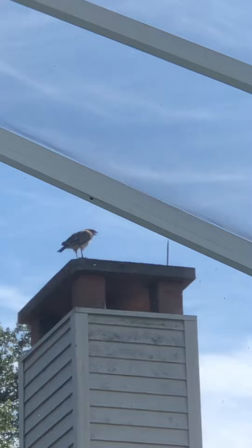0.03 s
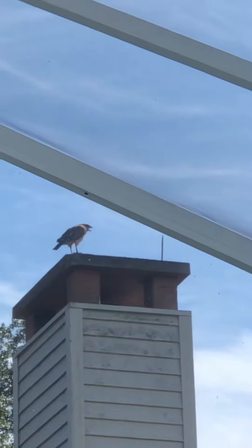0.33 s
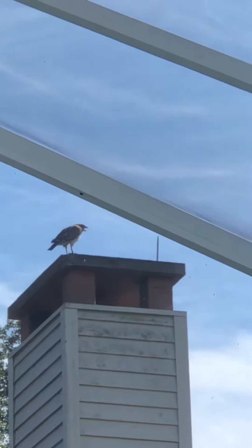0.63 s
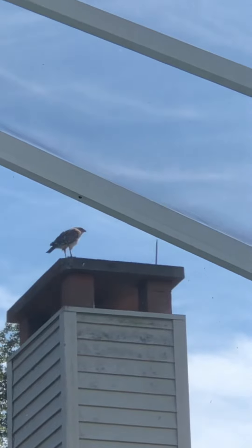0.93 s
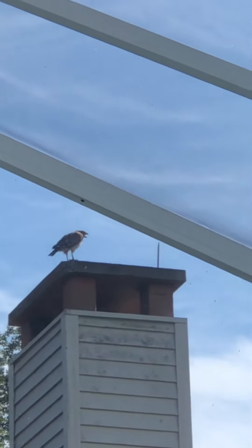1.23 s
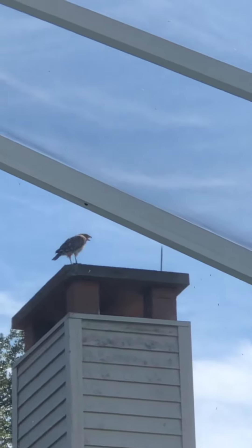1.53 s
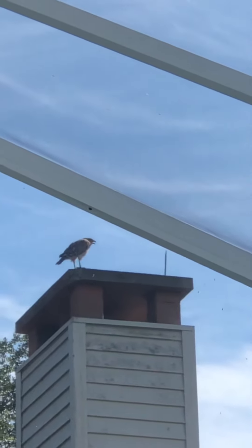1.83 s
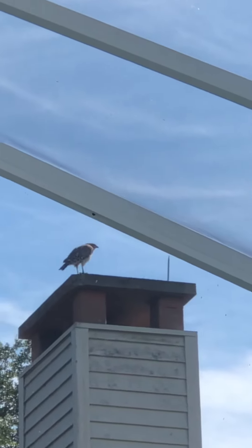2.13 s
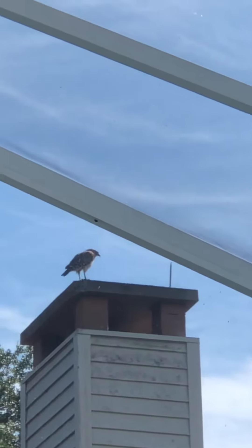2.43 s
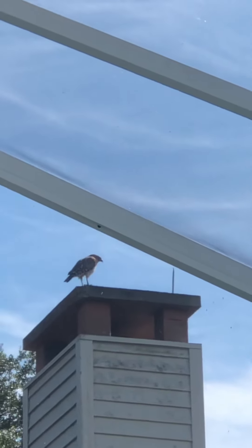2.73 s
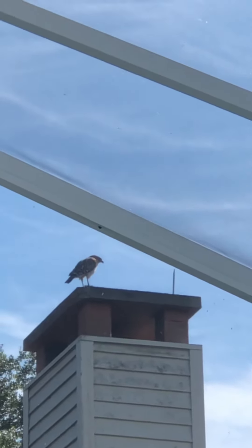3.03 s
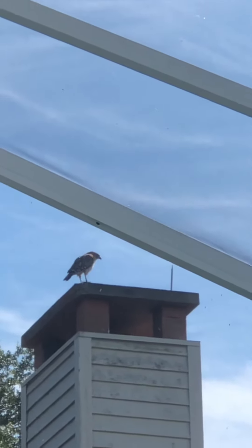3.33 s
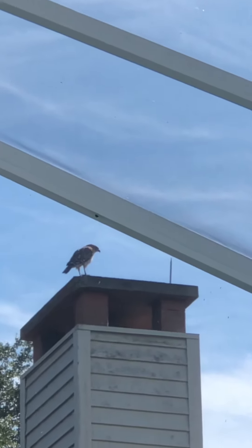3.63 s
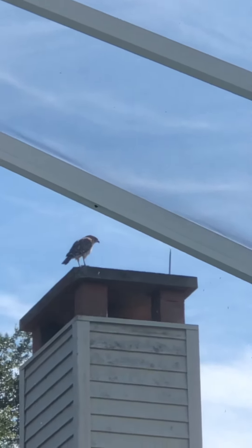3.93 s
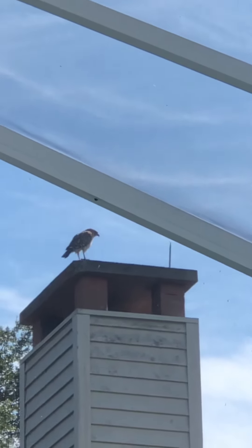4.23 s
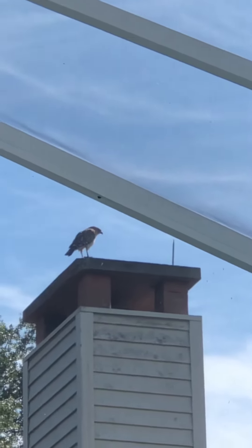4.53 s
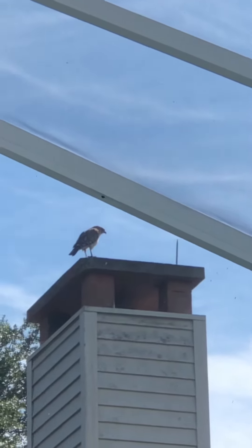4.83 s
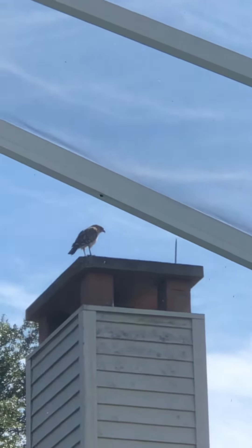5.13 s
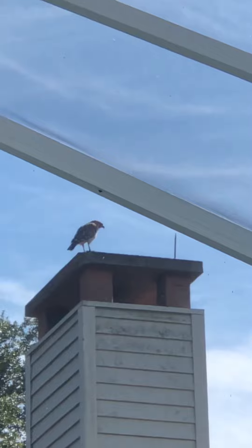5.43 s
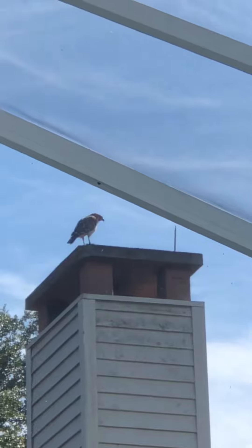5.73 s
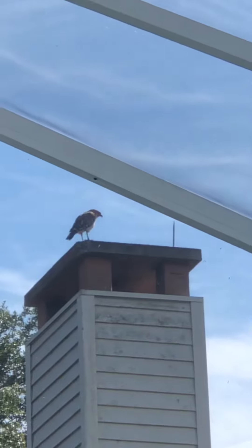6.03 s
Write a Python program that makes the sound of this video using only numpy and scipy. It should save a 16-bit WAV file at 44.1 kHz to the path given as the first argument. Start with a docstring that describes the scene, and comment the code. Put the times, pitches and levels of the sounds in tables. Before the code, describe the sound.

Two hoarse, two-note hawk screams echo across a yard, followed by faraway replies, with an air conditioner humming quietly underneath.

```python
"""A yard among walls and trees, heard from a hand-held camera's microphone. Close by, a hawk on a chimney
screams twice, "kee-aah": a high falling note that breaks down to a lower, hoarser one. Each side of
its syrinx sings a tone, and the throat rings on the partials. Walls and trees throw the cries back,
and other hawks answer from far away. An air conditioner hums under the outdoor hush, and the camera
is bumped a few times."""
import sys
import numpy as np
from scipy import signal
from scipy.fft import rfft, irfft, next_fast_len
from scipy.io import wavfile

SR = 44100
rng = np.random.default_rng(int(sys.argv[2]) if len(sys.argv) > 2 else 0)


def waveform_to_disk(signal):
    """Save audio, clipped to [-1, 1], as 16-bit WAV at the path in sys.argv[1]."""
    frames = np.transpose(np.atleast_2d(signal))
    scaled = np.clip(frames, -1, 1) * 32767
    samples = np.round(scaled).astype(np.int16)
    wavfile.write(sys.argv[1], SR, samples)


N = 268569
TIME = np.arange(N) / SR
EDGE_HZ = 15850  # top of the band
NOTE_EDGE_S = .005  # fade at each end of a near note

# the throat's response in the high register: (frequency [Hz], relative level [dB])
KEE_THROAT = [(700, -11), (1150, -7.5), (1420, -5), (2100, -0.5), (2700, -3), (3600, 0), (4250, -2),
              (4800, 0.5), (5550, 0.5), (6150, -14), (7400, -9), (8600, -19.5), (9900, -19.5), (11200, -30),
              (12600, -26), (13800, -43.5), (15500, -35)]
# slow drift of the hush and the hum: (time [s], level change [dB])
BACKGROUND_DRIFT = [(0, 2.5), (2.7, -0.5), (4.5, 0.68), (6.09, 0)]


def hawk():
    """The near hawk on its chimney: each scream catches, jumps to a high note and breaks into a low one."""
    # "kee": (time [s], length [s], top pitch [Hz], last pitch [Hz], ring level [dB],
    # ring offset before it blooms [dB], blooms after [s], ring fade [dB/s], flare at the break [dB],
    # level of the other partials [dB], their fade over the note [dB])
    high_notes = [(0.113, .293, 1444, 1177, -29.5, -7.5, 0.037, 19, 11, -37, 17),
                  (1.167, .355, 1430, 1186, -29.5, -9.5, 0.0805, 6, 15.4, -38, 8.3)]
    # "aah": (time [s], length [s], first pitch [Hz], sag [Hz/s], collapses after [s], last pitch [Hz],
    # ring level [dB], strongest overtone drops briefly at the microphone after [s])
    low_notes = [(0.394, .365, 915.7, 474.5, .238, 618, -39, 0.216),
                 (1.509, .336, 905, 301.7, 0.22, 635, -38.5, 0.147)]
    out = np.zeros(N)
    for row in high_notes:
        add(out, *catch(row[0]))
        add(out, *high_note(*row))
    for row in low_notes:
        add(out, *low_note(*row))
    return out


def catch(s, length_s=0.033, first_hz=833, last_hz=1064):
    """A short, rough upward croak that swells into the high note."""
    at = span(s - length_s, s + NOTE_EDGE_S)
    hz = np.linspace(first_hz, last_hz, len(at))
    db = np.linspace(-55, -45, len(at))
    start, croak = syrinx(at, hz, db, db - 4, KEE_THROAT, jitter=0.061, onset_jitter=0.022,
                          flicker_db=2, second_db=-26, rasp_db=-13)
    return start, croak * np.sqrt(np.linspace(0, 1, len(at)))


def high_note(s, length, top_hz, last_hz, db, unbloomed_db, bloom_s, fade_db_per_s, flare_db,
              rest_db, rest_fade_db, scoop=0.1375, scoop_s=0.01214):
    """The pitch scoops up and settles; the ring blooms, fades, and flares once as the voice breaks."""
    at = span(s, s + length)
    age = (at - at[0]) / SR
    left_s, open_s = age[::-1], np.maximum(age - bloom_s, 0)
    hz = settling(age, top_hz, last_hz) * (1 - scoop * np.exp(-age / scoop_s))
    bloom = .5 + .5 * np.tanh((age - bloom_s) / 0.0033)
    overshoot_db = 3 * bloom * np.exp(-open_s / 0.015)
    release_db = 13 * np.exp(-left_s / .045)
    ring = db + unbloomed_db * (1 - bloom) + overshoot_db - fade_db_per_s * open_s - release_db
    ring += flare_db * np.exp(-(left_s / .014) ** 2)
    rest = rest_db - rest_fade_db * (age / length) ** 3.1
    return syrinx(at, hz, ring, rest, KEE_THROAT, jitter=.0028, onset_jitter=0.018, waver=.002,
                  flicker_db=2.5, second_db=-7.5, rasp_db=-33, press_db=2)


def settling(age, top_hz, last_hz, settle_s=.16):
    """Pitch of a high note: holds, sinks, levels off."""
    sunk = 1 - 1 / (1 + (age / settle_s) ** 2.2)
    return top_hz + (last_hz - top_hz) * sunk / sunk[-1]


def low_note(s, length, first_hz, sag_hz_per_s, collapse_s, last_hz, db, dip_s, bend_s=0.0124):
    """The pitch sags, then collapses, while the level arches."""
    # the throat's response in the low register: (frequency [Hz], relative level [dB])
    aah_throat = [(650, -20), (880, -2), (1300, 4), (1750, -10.5), (2600, -8), (3400, -2.5), (4300, -3.5),
                  (5100, -4), (6000, -11.5), (6900, -7.5), (8200, -25.5), (9500, -23), (11800, -30.5),
                  (14000, -35.5)]
    at = span(s, s + length)
    age = (at - at[0]) / SR
    progress = age / length
    sagging = first_hz - sag_hz_per_s * age
    collapse = np.logaddexp(0, (age - collapse_s) / bend_s)
    hz = sagging + (last_hz - sagging[-1]) * collapse / collapse[-1]
    # heard at the microphone, the strongest overtone briefly drops in level
    dip_db = 8 * np.exp(-((age - dip_s) / 0.019) ** 2)
    overtone_db = db - 20 * (progress - 0.25) ** 2 - dip_db
    break_db = 6 * np.exp(-age / 0.038)
    rest_db = -47.5 - 27 * (progress - 0.59) ** 2 + break_db
    return syrinx(at, hz, overtone_db, rest_db, aah_throat, jitter=0.0067, onset_jitter=0.027,
                  waver=0.00427, flicker_db=3.0, second_db=-49.5, rasp_db=-19, slack_db=9)


def syrinx(at, hz, ring_db, rest_db, throat, jitter, onset_jitter, flicker_db, second_db, rasp_db,
           waver=0, press_db=0, slack_db=0, second_hz=2130, ring_hz=2520, ring_half_width_hz=600):
    """One side of the syrinx sings a harmonic stack; the other holds its own tone and adds sidebands."""
    # peaks and dips that make the cry's ringing band swell and fade as the pitch glides:
    # (frequency [Hz], gain [dB])
    ripple = [(2000, 8.5), (2350, -0.5), (2470, 3), (2600, -3.5), (2760, 0.5), (2900, 1.5)]
    size, age = len(at), (at - at[0]) / SR
    # the membranes flutter until they lock into their pitch
    unrest = jitter + onset_jitter * np.exp(-age / .014)
    turns = np.cumsum(hz * (1 + unrest * wander(340, size) + waver * wander(44.6, size))) / SR
    k = np.arange(1, 19)[:, None]
    partial_hz = k * hz
    # the first push is the brightest; as it slackens, the cry thins to its ring
    press = press_db * np.exp(-age / 0.2)
    rest_db = rest_db - slack_db * np.exp(-age[::-1] / 0.083)
    height = gain_of(read(throat, partial_hz) + press * (partial_hz > 6000)) * (partial_hz < EDGE_HZ)
    # the ring: partials inside the throat's main resonance, with a level of their own
    inside = 1 / (1 + ((partial_hz - ring_hz) / ring_half_width_hz) ** 8)
    ring = gain_of(ring_db) / np.linalg.norm(height * inside, axis=0)
    rest = gain_of(rest_db) / np.linalg.norm(height * (1 - inside) * (partial_hz > ring_hz), axis=0)
    # the rest flicker, each on its own, and the throat smears the pulses
    flicker = gain_of(flicker_db * np.array([wander(42, size) for _ in k]))
    lag, side_lag = rng.random((2, len(k), 1))
    weight = ring * gain_of(read(ripple, partial_hz)) * inside + rest * flicker * (1 - inside)
    stack = (height * weight * np.cos(2 * np.pi * (k * turns + lag))).sum(0)
    # the second tone joins a moment late, is chopped by the first into bright sidebands, and soon dies
    second_turns = np.cumsum(second_hz * (1 + .003 * wander(120, size))) / SR
    side_hz = second_hz + (k - 1) * hz
    side_db = read(throat, side_hz) + 2.5 * np.log2(side_hz / second_hz) + press * (side_hz > 6000)
    side_turns = second_turns + (k - 1) * turns + side_lag
    sidebands = gain_of(side_db) * (side_hz < EDGE_HZ) * np.cos(2 * np.pi * side_turns)
    second_envelope = (1 - np.exp(-(age / 0.0028) ** 2)) / (1 + (age / 0.062) ** 4)
    second = sidebands.sum(0) * gain_of(second_db) * second_envelope
    # air rasps through once a cycle, most at the start
    puffs = noise(throat, size) * (1 + np.cos(2 * np.pi * turns))
    rasp = puffs * gain_of(rasp_db) * (1 + 9 * np.exp(-age / .025))
    edges = np.minimum(1, np.minimum(age, age[::-1]) / NOTE_EDGE_S)
    return at[0] / SR, np.sqrt(2) * (stack + rest * (second + rasp)) * edges


def far_hawks(flutter_db=3.0, overlap_s=.02, sag_hz_per_s=345, second_hz=1448, second_sag_hz_per_s=370):
    """The same two-note scream from far off, fluttering on its way through the air to the microphone."""
    # (time [s], high note length [s], top pitch [Hz], pitch at the break [Hz], high note level [dB],
    # its loudest point [0-1], low note length [s], low pitch [Hz], low note level [dB],
    # level of the syrinx's second tone [dB], treble lift as the high note starts [dB])
    screams = [(3.379, 0.13, 1188, 1154, -67.5, 0.62, 0.48, 916, -68.5, -82.5, 5),
               (4.17, .32, 1228, 1082, -61.5, 0.38, 0.25, 872, -69.5, -72.5, 12),
               (4.945, .31, 1305, 1108, -60, 0.52, 0.26, 883, -63, -68.5, 5),
               (5.71, .31, 1298, 1117, -63, .48, .1, 894.4, -70, -67.5, -6.5)]
    out = np.zeros(N)
    for s, high_s, top_hz, break_hz, high_db, loudest, low_s, low_hz, low_db, second_db, lift in screams:
        high_age, low_age = span(0, high_s) / SR, span(0, low_s) / SR
        add(out, *far_note(s, settling(high_age, top_hz, break_hz), high_db, lift, loudest))
        add(out, *far_note(s, second_hz - second_sag_hz_per_s * high_age, second_db, lift_db=-17))
        add(out, *far_note(s + high_s - overlap_s, low_hz - sag_hz_per_s * low_age, low_db, lift_db=-18))
    return out * gain_of(flutter_db * wander(44))


def far_note(s, hz, db, lift_db, loudest=0.37, jitter=0.01, lift_s=0.089):
    """One distant note, its treble lifted or cut at the start; little but the throat's ring carries."""
    # the throat's response heard at a distance: (frequency [Hz], relative level [dB])
    far_throat = [(800, -23.5), (1250, 0.5), (1750, 7), (2350, 16.5), (2750, 8.5), (3300, -4), (3650, -1.5),
                  (4300, -13), (4900, -3), (7500, -34), (10000, -65)]
    size, k = len(hz), np.arange(1, 8)[:, None]
    lift = lift_db * np.exp(-np.arange(size) / SR / lift_s) * (k * hz[0] > 3100)
    hz = hz * (1 + jitter * wander(183, size))
    height = gain_of(read(far_throat, k * hz) + lift)
    stack = (height * np.cos(2 * np.pi * k * np.cumsum(hz) / SR)).sum(0)
    arch = gain_of(db - 22 * (np.linspace(0, 1, size) - loudest) ** 2)
    return s, arch * unit_rms(stack) * signal.windows.tukey(size, 0.222)


def walls(x):
    """Single echoes off nearby walls and roofs beat against the gliding pitch."""
    # (delay [s], level relative to the direct sound [dB])
    echoes = [(.0075, -24), (.019, -11.5), (.034, -17), (.052, -56), (.071, -13.5), (.098, -51.5)]
    out = np.zeros(N)
    for delay, db in echoes:
        add(out, delay, gain_of(db) * x)
    return out


def trees(x, reflections_per_s=2000, build_s=0.0017, dull_hz=7000):
    """Scattered reflections from around the yard; leaves soak up the treble."""
    # (frequency [Hz], time to die away by 60 decibels [s])
    decay_times = [(300, 0.287), (1500, 0.56), (2600, 0.45), (5000, 0.403), (9000, 0.31), (15000, 0.075)]
    taps = rng.choice([-1., 1.], SR) * (rng.random(SR) < reflections_per_s / SR)
    hz, t, spectra = signal.stft(taps, SR, nperseg=256)
    decay = gain_of(-60 * t / read(decay_times, hz)[:, None])
    treble_loss = np.hypot(1, hz / dull_hz)[:, None]
    build = 1 - np.exp(-t / build_s)
    tail = signal.istft(spectra * decay / treble_loss * build, SR, nperseg=256)[1]
    return signal.fftconvolve(x, tail / np.linalg.norm(tail))[:N]


def handling(grip_s=3.58, grip_spread_s=0.45, grip_db=-53.5):
    """Right at the microphone: the hand rumbles as it shifts its grip, bumps and brushes the camera."""
    # soft knocks: (time [s], peak level [dB], pitch [Hz], half length [s])
    bumps = [(3.459, -42, 135.6, 0.0084), (3.651, -40.5, 170.2, 0.0094), (3.668, -37, 74, 0.0028),
             (3.794, -37.5, 170.5, 0.0037), (3.799, -50, 91.8, 0.0097)]
    # fingers on the case: (time [s], level [dB], centre frequency [Hz], half length [s])
    brushes = [(2.25, -73.5, 8370, 0.088), (3.9, -69.5, 11000, .016)]
    # (frequency [Hz], relative level [dB])
    grip_spectrum = [(25, -36), (38, 2), (60, -7), (180, -10), (320, -49), (1000, -80)]
    out = noise(grip_spectrum) * gain_of(grip_db) * swell(grip_s, grip_spread_s)
    for s, db, hz, spread_s in bumps:
        out += gain_of(db) * swell(s, spread_s) * np.cos(2 * np.pi * hz * (TIME - s))
    for s, db, hz, spread_s in brushes:
        out += gain_of(db) * swell(s, spread_s) * noise([(hz / 2, -20), (hz, 0), (hz * 2, -20)])
    return out


def air_conditioner(buzz_hz=120.55, waver=0.00846, sway_db=1.2):
    """Wavering fan and compressor tones, and the motor's mains buzz, which fades once for a while."""
    # fan and compressor: (frequency [Hz], relative level [dB])
    tones = [(37.7, -16), (74.8, -1.5), (188.4, -15), (236, -16), (314, -17)]
    buzz_db = -55.5 - 3.5 * swell(s=4, spread_s=1.0) + 0.26 * wander(3.4)
    out = gain_of(buzz_db) * np.sin(2 * np.pi * buzz_hz * TIME)
    hum_db = -53 + np.interp(TIME, *np.transpose(BACKGROUND_DRIFT))
    for hz, db in tones:
        turns = np.cumsum(hz * (1 + waver * wander(2.23))) / SR
        out += gain_of(hum_db + db + sway_db * wander(1.8)) * np.sin(2 * np.pi * turns)
    return np.sqrt(2) * out


def outdoors(hush_db=-56.5, rumble_db=-57):
    """The yard's ambience: a wide hush over a low rumble, both swaying slightly."""
    # both spectra: (frequency [Hz], relative level [dB])
    hush_spectrum = [(120, -30), (200, -2), (447, -7), (498, -9.5), (609, -8), (745, -10.5), (998, -8.5),
                     (1150, -12), (1340, -13), (2190, -19), (4800, -24.5), (14900, -38.5), (15700, -34.5)]
    rumble_spectrum = [(24, -38), (36, -13), (60, 1.5), (90, 2), (140, -1.5), (200, -8), (260, -12.5),
                       (400, -59)]
    drift_db = np.interp(TIME, *np.transpose(BACKGROUND_DRIFT))
    hush = noise(hush_spectrum) * gain_of(hush_db + drift_db + 0.77 * wander(4.9))
    rumble = noise(rumble_spectrum) * gain_of(rumble_db + 0.6 * wander(3.9))
    return hush + rumble


def gain_of(db):
    """Decibels to gain."""
    return 10 ** (np.asarray(db) / 20)


def unit_rms(x):
    """Scales to rms 1."""
    return x / np.sqrt(np.mean(x ** 2) + 1e-20)


def read(points, hz):
    """Reads a curve on a log-frequency axis."""
    f, value = np.transpose(points)
    return np.interp(np.log(hz + 1), np.log(f + 1), value)


def add(mix, s, sound):
    """Mixes a sound in at a time."""
    part = mix[round(s * SR):][:len(sound)]
    part += sound[:len(part)]


def span(start, end):
    """Sample numbers between two times."""
    return np.arange(max(round(start * SR), 0), min(round(end * SR), N))


def swell(s, spread_s):
    """A bell-shaped envelope around a time."""
    return np.exp(-((TIME - s) / spread_s) ** 2)


def noise(spectrum, size=N):
    """Noise of rms 1 with the given spectrum."""
    count = next_fast_len(size)
    colour = gain_of(read(spectrum, np.fft.rfftfreq(count, 1 / SR)))
    return unit_rms(irfft(rfft(rng.standard_normal(count)) * colour, count)[:size])


def wander(rate_hz, size=N):
    """Smooth random motion of rms 1, mostly slower than the given rate."""
    count = size // 16 + 2
    f = np.fft.rfftfreq(count, 16 / SR)
    slow = irfft(rfft(rng.standard_normal(count)) / (1 + (f / rate_hz) ** 2), count)
    return np.interp(np.arange(size), np.linspace(0, size, count), unit_rms(slow))


def scene(direct_db=-3.5, wet_db=-14, far_wet_db=-9):
    """One microphone: the near hawk arrives mostly direct, the far ones with more scatter from the trees."""
    near, far = hawk(), far_hawks()
    birds = gain_of(direct_db) * (near + walls(near)) + far
    scattered = trees(gain_of(wet_db) * near + gain_of(far_wet_db) * far)
    return (birds + scattered + outdoors() + air_conditioner() + handling())[None]


def record(dry):
    """The recorder's band limit."""
    lowpass = signal.firwin(1023, EDGE_HZ, window=("kaiser", 9), fs=SR)
    return signal.oaconvolve(dry, lowpass[None], "same", axes=1)


dry = scene()
out = record(dry)
waveform_to_disk(out)
```